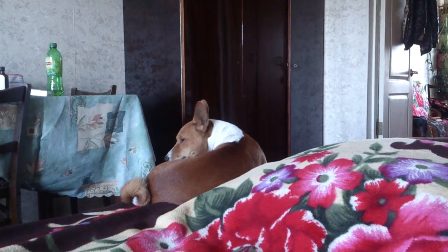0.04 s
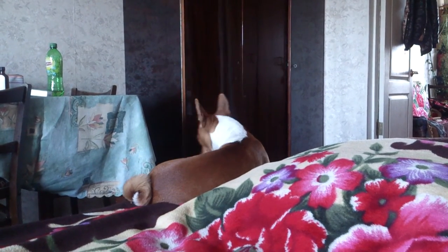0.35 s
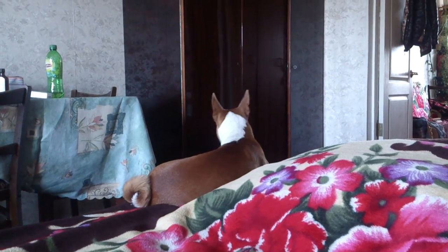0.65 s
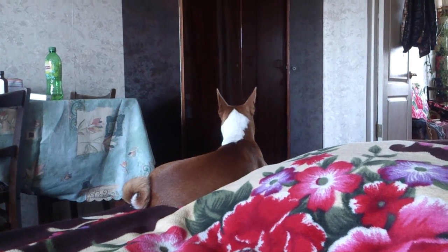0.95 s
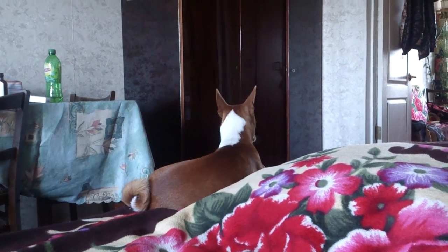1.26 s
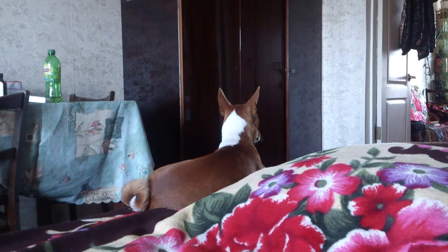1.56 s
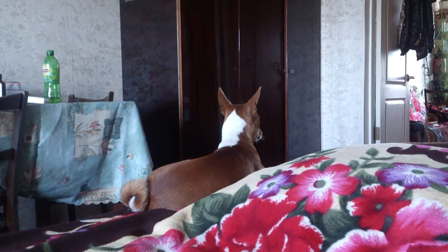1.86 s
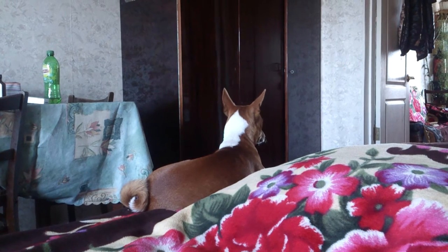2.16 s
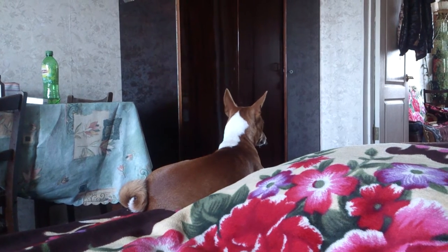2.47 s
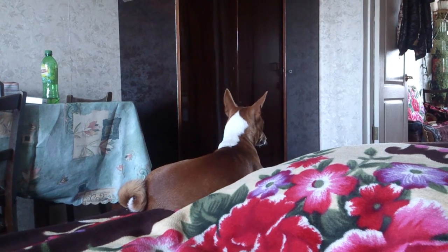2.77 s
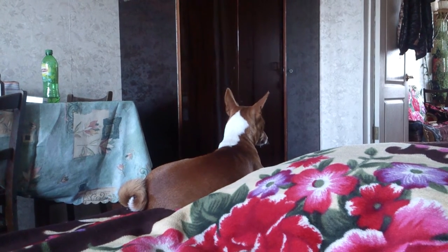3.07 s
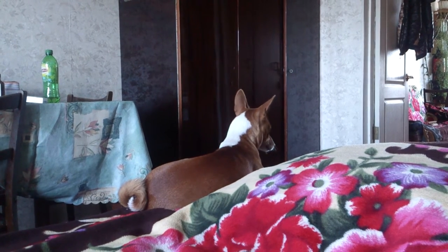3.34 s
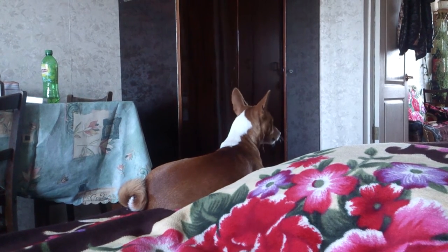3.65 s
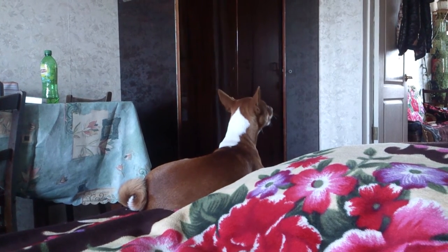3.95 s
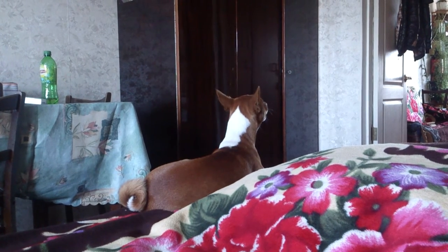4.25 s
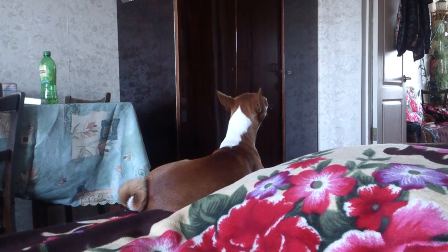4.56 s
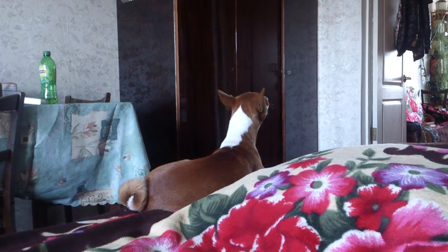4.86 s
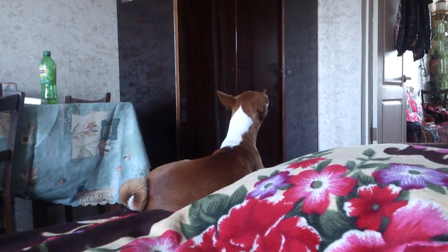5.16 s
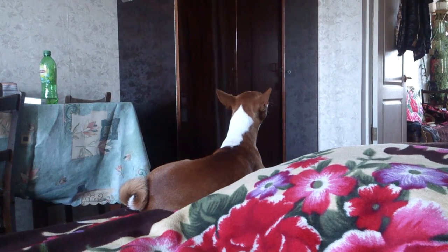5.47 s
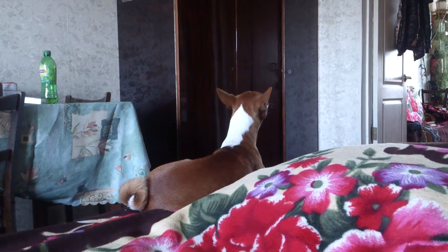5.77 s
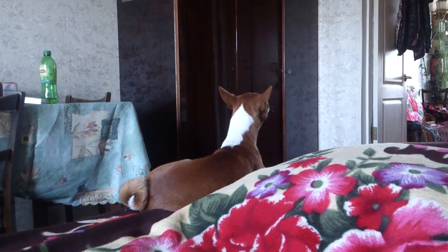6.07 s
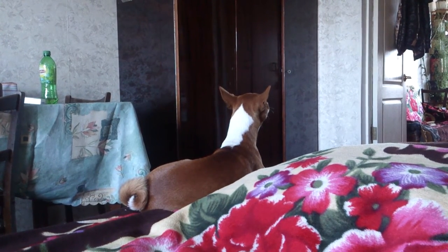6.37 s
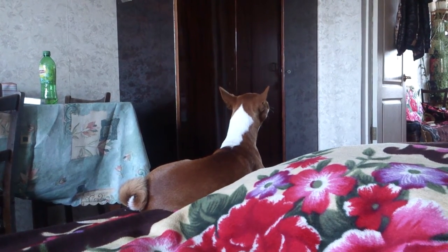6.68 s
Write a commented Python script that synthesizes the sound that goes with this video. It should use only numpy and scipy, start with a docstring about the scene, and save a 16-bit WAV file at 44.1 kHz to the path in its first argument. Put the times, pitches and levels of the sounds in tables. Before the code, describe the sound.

A dog whistles thinly through its nose, whines twice, then grumbles into one long, wavering howl in a quiet room.

```python
"""A dog whistles through its nose, whines twice, then grumbles into one long howl.
It lies on a bed, facing away. Its vocal folds make a pitch plus harmonics (whole multiples of that
pitch), and its mouth shapes them. Low harmonics bend round its head; high ones arrive mostly by the
walls of the small room. An engine pulls away far outside; the recorder adds hiss and a thin high whine."""
import sys
import numpy as np
from scipy import signal
from scipy.fft import rfft, irfft, next_fast_len
from scipy.io import wavfile
from scipy.ndimage import uniform_filter1d

SR = 44100
rng = np.random.default_rng(int(sys.argv[2]) if len(sys.argv) > 2 else 0)


def wrap_up_sound(samples):
    """Save the sound to the file named by the first command line argument, as 16-bit audio."""
    columns = np.atleast_2d(samples).T
    # keep every value between -1 and 1, then stretch to whole-number steps
    tamed = np.clip(columns, -1, 1)
    steps = np.round(tamed * 32767).astype(np.int16)
    wavfile.write(sys.argv[1], SR, steps)


N = 296352
TIME = np.arange(N) / SR
BINS_HZ = np.fft.rfftfreq(N, 1 / SR)
TOP_HZ = 15480


def amp(db):
    """Turns decibels into a gain."""
    return 10 ** (np.asarray(db) / 20)

def unit(x):
    """Scales a signal to an average power of 1."""
    return x / np.sqrt(np.mean(x ** 2) + 1e-20)

def at_hz(points, hz):
    """Reads a table at any frequency, sliding evenly from octave to octave."""
    row_hz, value = np.transpose(points)
    return np.interp(np.log(hz + 1), np.log(row_hz + 1), value)

def at_time(rows, t):
    """Reads every column of a table at the times t."""
    row_s, *columns = np.transpose(rows)
    return [np.interp(t, row_s, column) for column in columns]

def span(rows):
    """The times a table covers, and a quick fade in and out."""
    t = TIME[(TIME >= rows[0][0]) & (TIME <= rows[-1][0])]
    return t, np.clip(np.minimum(t - t[0], t[-1] - t) / .006, 0, 1)

def add(mix, start_s, sound):
    """Mixes a sound in at its start time."""
    part = mix[round(start_s * SR):][:len(sound)]
    part += sound[:len(part)]

def noise(gain):
    """Noise of power 1, shaped by a gain for each frequency."""
    return unit(irfft(rfft(rng.standard_normal(N)) * gain, N))

def wander(t, rate_hz):
    """A random drift of about 1 either way, mostly slower than rate_hz."""
    coarse = TIME[::16]
    hz = np.fft.rfftfreq(len(coarse), coarse[1])
    spectrum = rfft(rng.standard_normal(len(coarse))) / (1 + (hz / rate_hz) ** 4)
    return np.interp(t, coarse, unit(irfft(spectrum, len(coarse))))


# Tone of the background noise: frequency_hz, gain_db
BACKGROUND_TONE = [(15, -70), (25, -62), (45, -9.5), (71, 1.5), (109, -11), (164, -8.5), (220, -16.5),
                   (366, -21.5), (454, -22.5), (961, -21), (1690, -27.5), (7800, -38), (9660, -32),
                   (10500, -37), (15200, -37.5)]
def background(level_db=-58):
    """A steady low rumble with faint hiss."""
    return amp(level_db) * noise(amp(at_hz(BACKGROUND_TONE, BINS_HZ)))

def electronics(whine_hz=9766, whine_db=-74, fizz_hz=9620, width_hz=130, fizz_db=-79):
    """The recorder's circuits add a thin, steady whine in a narrow band of fizz."""
    tone = amp(whine_db) * unit(np.sin(2 * np.pi * whine_hz * TIME))
    fizz = amp(fizz_db) * noise(1 / (1 + (2 * (BINS_HZ - fizz_hz) / width_hz) ** 2))
    return tone + fizz

# The engine revs up, changes gear and levels off: time_s, firing_rate_hz, relative_level_db
ENGINE_REVS = [(0, 80, -78), (.9, 113, -64), (1.3, 128, -70), (1.55, 66, -85), (1.9, 63, -69),
               (2.3, 69, -59.5), (3.1, 90, -62), (3.6, 101, -63), (4.5, 118, -62), (5.2, 104, -66),
               (5.65, 106, -64.5), (5.95, 112, -52), (6.2, 109, -66), (6.72, 108, -66.5)]
def far_engine(octave_db=-18, gain_db=-1):
    """Only the engine's lowest note and the octave above it come through the walls."""
    hz, db = at_time(ENGINE_REVS, TIME)
    phase = 2 * np.pi * np.cumsum(hz * (1 + 0.019 * wander(TIME, rate_hz=9.7))) / SR
    drone = np.sin(phase) + amp(octave_db) * np.sin(2 * phase)
    swell_db = 2 * wander(TIME, rate_hz=8)
    return unit(drone) * amp(db + gain_db + swell_db)

# How long echoes take to fade by 60 dB: frequency_hz, fade_s
ECHO_FADE = [(200, 0.51), (1000, 0.61), (4000, 0.26), (10000, 0.24)]
# How loud echoes are next to the direct sound: frequency_hz, gain_db
ECHO_LEVEL = [(100, -16), (550, -15), (1150, -13), (1700, -4), (2400, 1), (4000, 8), (10000, 12)]
def room(sound, echoes_per_s=3000):
    """The direct sound plus many quick echoes off the walls, at about the same total power."""
    t = TIME[:SR // 2]
    echoes = rng.standard_normal(len(t)) * (rng.random(len(t)) < echoes_per_s / SR) * (t > .003)
    hz, age_s, bands = signal.stft(echoes, SR, nperseg=256)
    decay = amp(-60 * age_s / at_hz(ECHO_FADE, hz)[:, None])
    decay /= np.sqrt(np.mean(decay ** 2, axis=1, keepdims=True))
    tail = signal.istft(bands * decay, SR, nperseg=256)[1] / np.linalg.norm(echoes)
    size = next_fast_len(N + SR, True)
    echo_gain = amp(at_hz(ECHO_LEVEL, np.fft.rfftfreq(size, 1 / SR)))
    response = (1 + echo_gain * rfft(tail, size)) / np.sqrt(1 + echo_gain ** 2)
    return irfft(rfft(sound, size) * response, size)[:N]

# Pitches the room boosts or swallows at the bed: centre_hz, width_hz, gain_db
ROOM_PEAKS_AND_DIPS = [(509, 22, -7.3), (550, 23, 6.0), (568, 26, -12.5), (958, 5, -18.1), (997, 50, -18.1),
                       (1004, 13, 9.1), (1050, 15, -17.5), (1082, 20, -15.5), (1133, 5, -10.8),
                       (1532, 5, -12.9), (1631, 24, -7.4), (1687, 13, 4.1), (1740, 21, -10.5),
                       (1926, 5, -3.8), (2208, 21, -9.9), (2266, 18, -6.2), (2562, 9, -17.6),
                       (2857, 9, -18.1)]
def standing_waves_db(hz):
    """Echoes add up or cancel, so a harmonic swells or drops out as its pitch slides."""
    return sum(db / (1 + (2 * (hz - centre) / width) ** 2) for centre, width, db in ROOM_PEAKS_AND_DIPS)

# Smacks of the lips: start_s, level_db, pitch_hz
LIP_SMACKS = [(3.126, -29, 1900), (3.507, -38, 2200)]
def lip_smack(start_s, level_db, pitch_hz, decay_s=0.00017):
    """Parting lips give the mouth one short knock."""
    t = TIME[:600]
    return start_s, amp(level_db) * np.exp(-t / decay_s) * np.sin(2 * np.pi * pitch_hz * t)

# Whistles through the nose: start_s, length_s, start_hz, middle_hz, end_hz, level_db
NOSE_WHISTLES = [(0.111, 0.21, 6140, 6060, 5320, -56), (.12, 0.15, 4850, 5180, 5040, -68),
                 (0.157, .13, 8050, 8220, 8400, -71), (0.271, 0.051, 8470, 8760, 8870, -55),
                 (0.647, 0.19, 4790, 4280, 4130, -57.5), (0.888, 0.2, 4250, 4120, 3970, -58.5),
                 (1.073, 0.12, 4880, 4630, 4720, -70), (1.597, .14, 4570, 5000, 4720, -75),
                 (1.814, 0.16, 4560, 4520, 4300, -71)]
# The first whine breaks and drops as it ends: one row, same columns
VOICE_BREAK = (1.065, .075, 920, 815, 718, -56)
def whistle(start_s, length_s, start_hz, middle_hz, end_hz, level_db, wobble, octave_db):
    """A shaky, almost pure tone that swells and fades as it bends through three pitches."""
    t = np.arange(0, length_s, 1 / SR)
    progress = t / length_s
    hz = np.polyval(np.polyfit([0, .5, 1], [start_hz, middle_hz, end_hz], 2), progress)
    phase = 2 * np.pi * np.cumsum(hz * (1 + wobble * wander(t, rate_hz=260))) / SR
    arch = np.sqrt(2 * abs(np.sin(np.pi * progress)))
    return start_s, amp(level_db) * arch * (np.sin(phase) + amp(octave_db) * np.sin(2 * phase))

# The hoarse grumble that opens the howl: time_s, relative_level_db
GRUMBLE_LEVEL = [(2.89, -67), (2.95, -61.5), (3.11, -56), (3.2, -79)]
# Its tone: frequency_hz, gain_db
GRUMBLE_TONE = [(150, -1), (280, 2), (520, 5), (800, -1), (1150, 1.5), (1800, -24), (2450, 0), (3100, -35),
                (3700, -8), (4050, -17), (4520, -2), (5200, -37), (9000, -43)]
def grumble(flutter_db=3, gain_db=2):
    """The vocal folds flap unevenly before they settle on a pitch."""
    t, fade = span(GRUMBLE_LEVEL)
    breath = noise(amp(at_hz(GRUMBLE_TONE, BINS_HZ)))[:len(t)]
    flutter = amp(flutter_db * wander(t, rate_hz=260))
    return t[0], fade * amp(at_time(GRUMBLE_LEVEL, t)[0] + gain_db) * unit(breath * flutter)

def overtones(phase, hz, shares, tone, pose, tilt_db, room_share, sway_db=3.5, flicker_db=2):
    """Upper harmonics, shaped by the dog's pose: 0 is mouth half shut, 1 mouth open, 2 head lifted."""
    t, coarse = TIME[:len(hz)], slice(None, None, 64)
    tone_hz, *shapes = np.transpose(tone)
    pose = np.clip(pose[coarse], 0, len(shapes) - 1)
    blend = [np.maximum(1 - abs(pose - j), 0) for j in range(len(shapes))]
    sound, power = 0, 1e-12
    for k, share in shares.items():  # k is the harmonic's number
        harmonic_hz = k * hz[coarse]
        db = sum(part * at_hz(np.c_[tone_hz, shape], harmonic_hz) for part, shape in zip(blend, shapes))
        db += tilt_db[coarse] * np.log2(k / min(shares))
        # as the head sways, each high harmonic swells and fades on its own
        db += sway_db * min(k / 12, 1) ** 2 * wander(t[coarse], rate_hz=4)
        db += flicker_db * wander(t[coarse], rate_hz=11)
        gain = share[coarse] * amp(db)
        heard = gain * amp(room_share * standing_waves_db(harmonic_hz))
        sound += np.interp(t, t[coarse], heard) * np.cos(k * phase + k * k)
        power += gain ** 2
    return sound * np.sqrt(2 / np.interp(t, t[coarse], power))  # only the room changes the total power

# Moments when the voice catches: time_s, half_length_s, dip_db
VOICE_CATCHES = [(.855, 0.031, -9.5), (1.721, .011, -6), (2.052, 0.016, -7.5), (3.196, 0.011, -10),
                 (3.864, .014, -3), (4.509, 0.012, -8.5), (4.638, 0.0085, -10.5), (5.024, 0.03, -5.5)]
def catches(t):
    """A gain that dips briefly each time the voice catches."""
    return amp(sum(db * np.exp(-((t - time_s) / half_s) ** 2) for time_s, half_s, db in VOICE_CATCHES))

# How the mouth shapes the overtones: frequency_hz, half_shut_db, open_db, head_lifted_db
MOUTH_TONE = [(1200, 3, -8, 3), (1453, 0, -10.5, -13), (1657, -3, 0, 1), (1915, -5, 13, -5),
              (2048, 10.5, -8.5, -8.5), (2444, -0.5, -4, -1.5), (2930, -19, -24.5, -15.5),
              (3290, -24, -49, -21.5)]
# Tone of the rasping air: frequency_hz, gain_db
RASP_TONE = [(300, -22.5), (600, -29.5), (1200, 14), (1800, 0), (2400, 8.5), (3200, -7.5), (5000, -27),
             (9000, -19), (13000, -29.5)]
def voice(t, pitch, levels_db, rasp_db, pose, treble_tone, room_share):
    """Vibrating vocal folds: the more they rasp, the shakier the pitch and loudness."""
    first, second, mouth, treble = map(amp, levels_db)
    hz = uniform_filter1d(at_time(pitch, t)[0], size=900)
    wobble = .0021 * wander(t, rate_hz=45) + .0016 * wander(t, rate_hz=130)
    roughness = np.minimum(amp(.7 * (rasp_db + 20)), 4)
    phase = 2 * np.pi * np.cumsum(hz * (1 + wobble * roughness)) / SR
    low = np.sqrt(2) * sum(gain * amp(room_share * standing_waves_db(k * hz)) * np.cos(k * phase)
                           for k, gain in ((1, first), (2, second)))
    # a harmonic passes from the middle band to the treble as it climbs past 3150 Hz
    crossed = {k: np.clip((k * hz - 3150) / 250, 0, 1) for k in range(3, 26)}
    middle_shares = {k: 1 - crossed[k] for k in range(3, 9)}
    treble_shares = {k: crossed[k] * (k * hz < TOP_HZ) for k in range(4, 26)}
    tilt_db = 0.44 * (levels_db[-1] - np.max(levels_db[-1]))  # per octave: weaker treble is duller too
    flat = np.zeros(len(t))
    middle = mouth * overtones(phase, hz, middle_shares, MOUTH_TONE, pose, flat, room_share)
    high = treble * overtones(phase, hz, treble_shares, treble_tone, pose, flat + tilt_db, room_share)
    tremble = 1 + np.minimum(2.5 * amp(rasp_db), .3) * wander(t, rate_hz=49)
    air = noise(amp(at_hz(RASP_TONE, BINS_HZ)))[:len(t)]
    rasp = air * (1 + np.cos(phase)) * mouth * amp(rasp_db)  # one puff through the folds each cycle
    return catches(t) * tremble * (low + middle + high) + rasp

# The tune of each whine: time_s, pitch_hz
FIRST_WHINE_TUNE = [(0.643, 974), (.7, 1050), (0.774, 920), (.88, 945), (1.005, 1023), (1.124, 934)]
SECOND_WHINE_TUNE = [(1.6, 672), (1.69, 715), (1.771, 679), (1.831, 692.6), (1.94, 665.4), (2.08, 708.5),
                     (2.17, 675)]
# Each whine at its midpoint: first_harmonic_db, second_harmonic_db, mouth_db, treble_db, rasp_db, pose
WHINE_VOICES = [(-51, -56, -62, -62, -16, 1), (-55, -61, -65, -71, -20, 0.38)]
# Tone of the whines' treble: frequency_hz, gain_db
WHINE_TREBLE_TONE = [(3400, 4.5), (4100, 8.5), (4500, -10), (5050, -14), (6000, -4.5), (7200, -12),
                     (9000, -10), (11000, -25)]
def whine(pitch, first_db, second_db, mouth_db, treble_db, rasp_db, pose):
    """A short, wavering call that starts quickly, grows, then eases off."""
    fade_in_s, fade_out_s, swell_db, arch_db, waver_db = 0.02, 0.038, 6, 3, 2
    t, _ = span(pitch)
    fade = np.clip(np.minimum((t - t[0]) / fade_in_s, (t[-1] - t) / fade_out_s), 0, 1)
    from_middle = np.linspace(-1, 1, len(t))
    swell = amp(swell_db * from_middle / 2 - arch_db * from_middle ** 2)
    low_db = [db + waver_db * wander(t, rate_hz=8.9) for db in (first_db, second_db)]
    levels_db = *low_db, mouth_db, treble_db
    call = voice(t, pitch, levels_db, rasp_db, np.full(len(t), pose), WHINE_TREBLE_TONE, room_share=0.13)
    return t[0], fade * swell * call

# The tune of the howl: time_s, pitch_hz
HOWL_TUNE = [(3.13, 473.0), (3.4, 401.6), (3.59, 512.0), (3.76, 477.0), (3.86, 484.5), (3.94, 504.2),
             (4.01, 492.0), (4.19, 488.0), (4.35, 548.6), (4.47, 563.0), (4.58, 582.0), (4.68, 565.0),
             (4.86, 561.4), (5.19, 573.0), (5.57, 559.7), (5.67, 553.2), (5.85, 522.0), (6.22, 497.4),
             (6.3, 484.8), (6.6, 481.2), (6.72, 487.0)]
# It swells, holds and eases off: time_s, first_harmonic_db, mouth_db
HOWL_LEVELS = [(3.13, -56.5, -63), (3.24, -52, -66.5), (3.41, -51.5, -72), (3.59, -54, -58.5),
               (3.67, -57.5, -44), (3.87, -44.5, -43.5), (3.94, -41.5, -36), (4.2, -39.5, -39),
               (4.4, -28.5, -33), (4.9, -27, -34), (5.15, -25, -33.5), (5.3, -20.5, -36),
               (5.66, -23, -30.5), (6.0, -29, -38.5), (6.15, -28, -32), (6.3, -33, -40.5),
               (6.72, -32.5, -35.5)]
# Its roughness and the dog's pose: time_s, rasp_db, pose
HOWL_RASP_AND_POSE = [(3.13, -7, 0), (3.5, -11, 0), (3.7, -25, 0), (3.86, -25, 0), (3.92, -28, 1),
                      (4.2, -28, 1), (4.5, -31, 1.6), (4.7, -23, 2), (4.78, -29, 2), (4.87, -27, 2),
                      (5.0, -39, 2), (5.7, -43, 2), (6.3, -32, 1.6), (6.72, -31, 1.5)]
# How far the second harmonic stands above mouth_db: half_shut_db, open_db, head_lifted_db
SECOND_HARMONIC_LIFT = (8.5, 7.5, 10)
# Loudness of the treble: time_s, level_db
HOWL_TREBLE_LEVEL = [(3.13, -73), (3.5, -76), (3.95, -56.5), (4.75, -55.5), (5.05, -48), (5.68, -54),
                     (6.15, -59), (6.35, -66.5), (6.72, -66)]
# Tone of the treble: frequency_hz, half_shut_db, open_db, head_lifted_db
HOWL_TREBLE_TONE = [(3440, 0.5, 4.5, -3.5), (3850, -9, -5, -8.5), (4486, -4, -19.5, 8),
                    (4990, -32, -19, -13), (5870, -34.5, -28, -23.5), (6240, -29, -11, -7.5),
                    (6600, -21, -27, -9), (7810, 9, -5.5, 0.5), (7990, -4, -17, -14), (8630, 2, 8, 4),
                    (9720, -18, -17, -1.5), (10400, -25, -9, -1.5), (11120, -22, -12, -22),
                    (11900, -34, -26.5, -28.5), (13500, -36, -31, -24.5)]
def howl():
    """One long call that starts rough with the mouth half shut and clears as the head lifts."""
    t, fade = span(HOWL_TUNE)
    first_db, mouth_db = at_time(HOWL_LEVELS, t)
    rasp_db, pose = at_time(HOWL_RASP_AND_POSE, t)
    second_db = mouth_db + np.interp(pose, [0, 1, 2], SECOND_HARMONIC_LIFT)
    levels_db = first_db, second_db, mouth_db, at_time(HOWL_TREBLE_LEVEL, t)[0]
    return t[0], fade * voice(t, HOWL_TUNE, levels_db, rasp_db, pose, HOWL_TREBLE_TONE, room_share=1)


def scene():
    """The dog in its room, over the background noise and the far engine."""
    dog = np.zeros(N)
    add(dog, *howl())
    for pitch, row in zip((FIRST_WHINE_TUNE, SECOND_WHINE_TUNE), WHINE_VOICES):
        add(dog, *whine(pitch, *row))
    for row in NOSE_WHISTLES:
        add(dog, *whistle(*row, wobble=0.0096, octave_db=-21))
    add(dog, *whistle(*VOICE_BREAK, wobble=0.046, octave_db=-15))
    add(dog, *grumble())
    for row in LIP_SMACKS:
        add(dog, *lip_smack(*row))
    return (background() + room(dog) + far_engine())[None]

def record(dry):
    """Adds the whine of the electronics, then cuts everything above TOP_HZ."""
    low_pass = signal.firwin(801, TOP_HZ, window=("kaiser", 9), fs=SR)
    return signal.oaconvolve(dry + electronics(), low_pass[None], "same")


dry = scene()
out = record(dry)
wrap_up_sound(out)
```